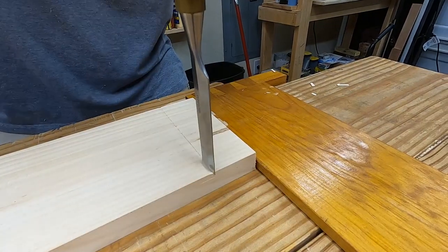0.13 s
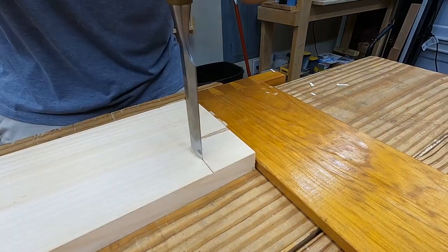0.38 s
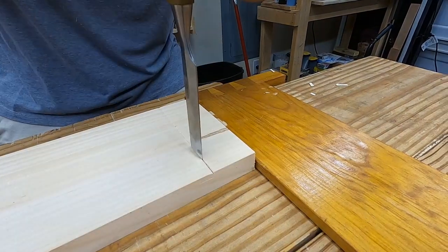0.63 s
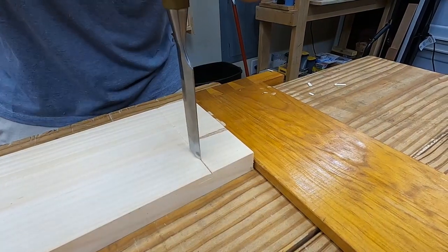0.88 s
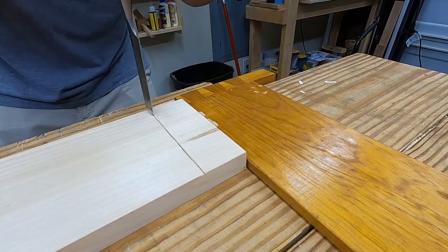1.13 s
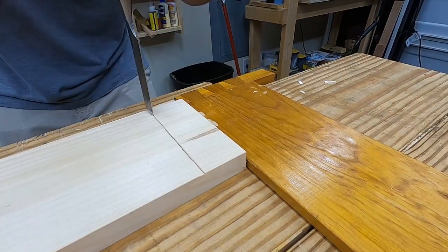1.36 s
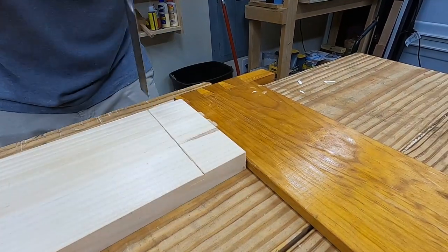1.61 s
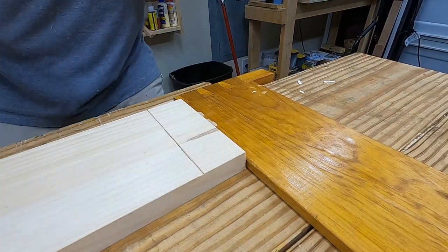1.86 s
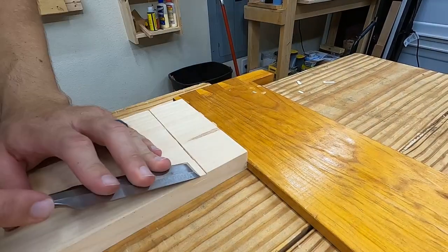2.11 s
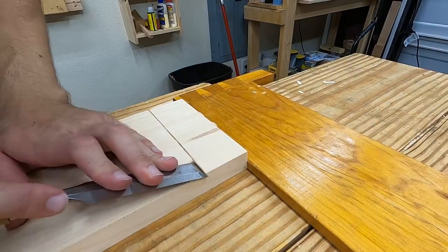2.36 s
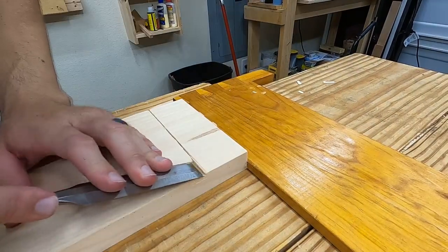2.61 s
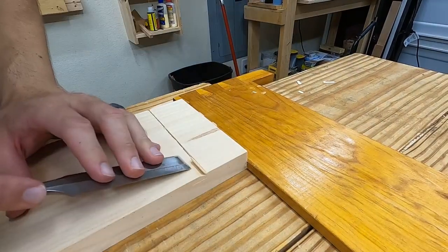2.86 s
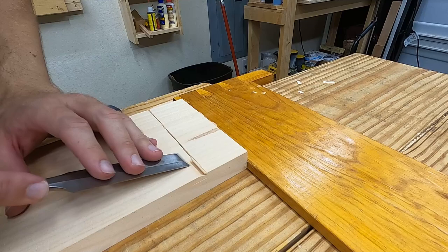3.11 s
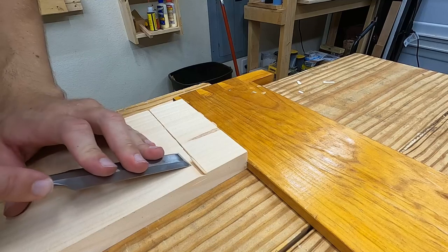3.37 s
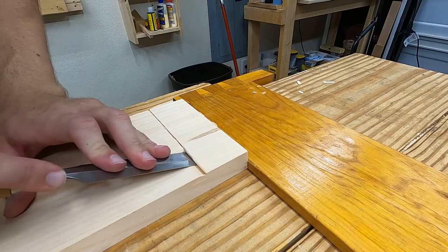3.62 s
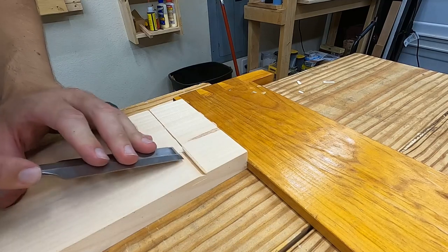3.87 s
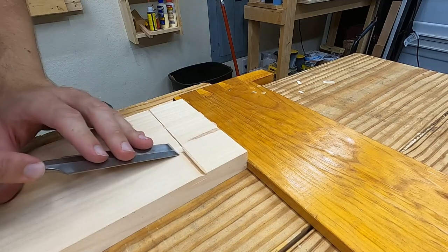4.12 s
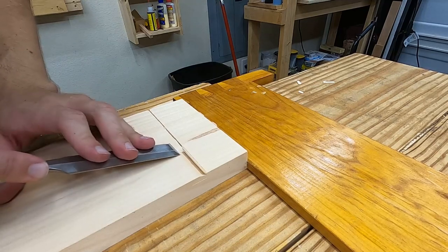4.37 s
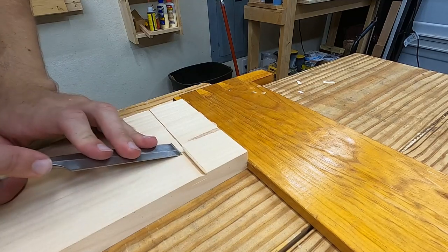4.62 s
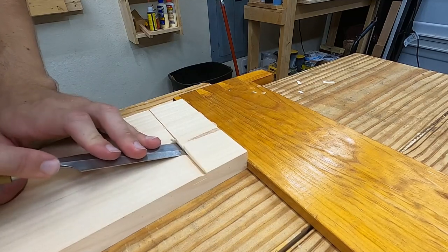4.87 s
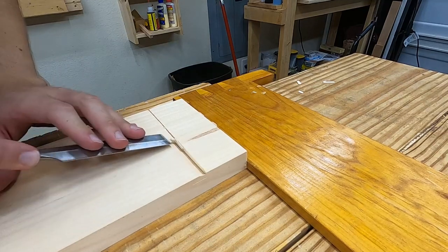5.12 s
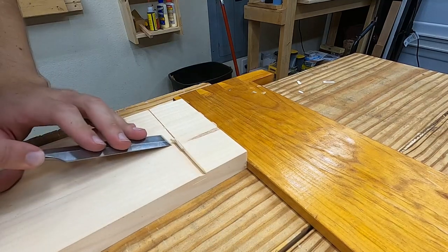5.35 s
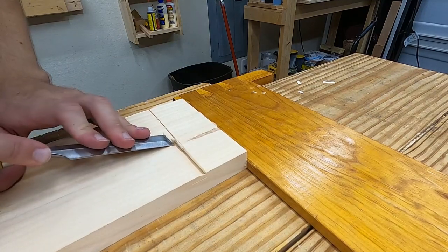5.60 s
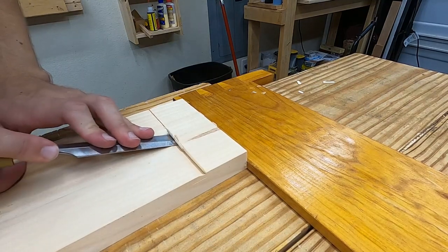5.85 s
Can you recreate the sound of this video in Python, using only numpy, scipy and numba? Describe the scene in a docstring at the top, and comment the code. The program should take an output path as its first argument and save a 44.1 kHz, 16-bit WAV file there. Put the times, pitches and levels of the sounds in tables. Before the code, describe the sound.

Close stereo microphones hear sharp wooden cracks ringing around a workshop, some echo tails cut off suddenly and loud ones swelling back. Five chisel blows come first. Then the blade is pushed by hand in short, rough bursts, with dry hiss, faint metallic ringing, bench rumble, little clicks and snapping fibres, ending in a tight flurry.

```python
"""Chisel on softwood

A mallet knocks a chisel five times into a softwood board on a bench, then the chisel pares across the grain by hand.
Each blow is a crack of decaying blade and board modes over the thud of the bench modes; an earlier blow still echoes.
Paring is grainy noise that hisses, snaps, makes the blade sing and shakes the bench.
Decaying noise bands make the workshop echo, over a low hum. Some tails break off abruptly,
and gain control ducks after hard blows, so their echo swells back."""
import sys
import numpy as np
from scipy import signal
from scipy.fft import rfft, irfft
from scipy.io import wavfile
from scipy.ndimage import uniform_filter1d
from numba import njit

SR = 44100
rng = np.random.default_rng(int(sys.argv[2]) if len(sys.argv) > 2 else 0)


def voltage_ratio(decibels):
    """Convert decibels (scalar or array-like) to amplitude ratios, 20 dB per decade."""
    exponent = np.asarray(decibels, float) / 20
    return 10 ** exponent


def inscribe(sig):
    """Save sig as 16-bit PCM at rate SR to the path in sys.argv[1].

    A 1-D sig is mono; a 2-D sig holds one channel per row.
    Samples are clipped to [-1, 1] before scaling.
    """
    pcm = np.round(np.clip(np.atleast_2d(sig).T, -1, 1) * 32767)
    wavfile.write(sys.argv[1], SR, pcm.astype(np.int16))


N = 263762
T = np.arange(N) / SR
LEAD = SR // 2  # samples of run-up: the workshop already rings at the opening

# Colour of the hum. Each row: frequency in Hz, relative density in dB per Hz.
AIR_COLOUR = [(15, -46.5), (25, -6.5), (60, -6), (113, -20), (136, -11.5), (301, -16.5), (425, -32),
              (2080, -45.5), (3830, -52.5), (9170, -61.5), (14000, -58.5)]
AIR_DB = -57  # rms
# Workshop echo. Each row: band centre in Hz, relative level in dB, 60 dB decay in seconds.
ECHO_BANDS = [(59, -5, 0.35), (130, -7.5, 0.33), (254, 1, 0.54), (483, -6, .6), (694, -13, .6),
              (1200, -10.5, 0.75), (1970, -15.5, 0.73), (3120, -17.5, 0.67), (6000, -16, 0.71),
              (8900, -17, 0.5), (13700, -21, 0.083)]
# Width of echo and hum. Each row: frequency in Hz, side over middle in dB before each source's own trim.
SIDE_COLOUR = [(60, -23), (110, -11.5), (200, -21.5), (380, -10), (700, -6.5), (1290, -8), (2380, -5),
               (4400, -3), (8120, 1.5), (15000, -9)]
# Moments in seconds where everything but the hum breaks off.
CUTS_S = [.3155, 1.1345, 2.068]

# Modes of blade and board. Each row: nominal frequency in Hz, relative level in dB, nominal 60 dB decay in seconds.
BLADE_MODES = [(700, -4, .012), (930, 0, .015), (1210, 0, .015), (1730, -3, .012), (2130, -3, .009),
               (2480, -3, .009), (3200, -1, .008), (3830, -7, .006), (4500, -6, .006), (5050, -6, .005),
               (6700, -8, .004), (7400, -10, .004), (8400, -11, .004), (9300, -9, .004), (11900, -20, .003)]
# Modes of the bench top. Each row: frequency in Hz, relative level in dB, 60 dB decay in seconds.
BENCH_MODES = [(54, -14, .4), (73, -10, .35), (102, -2, .35), (144, 0, .35), (172, -4, .2), (202, 0, .25),
               (224, -3, .25), (250, -5, .2), (290, -8, .2), (318, -8, .2), (343, -8, .2), (388, -8, .2),
               (425, -12, .15), (165, 6, .05), (500, -10, .04), (640, -12, .03)]
# The free blade when dragged. Each row: frequency in Hz, relative level in dB, 60 dB decay in seconds.
SINGING_MODES = [(1250, -6, .04), (3070, 0, .055), (3300, -3, .035), (6100, -16, .03)]

# Colour of the cutting edge. Each row: frequency in Hz, relative density in dB per Hz.
EDGE_COLOUR = [(290, -5.5), (500, -18), (795, -4), (1300, 3.5), (1420, -1), (2040, -4.5), (2770, -8.5),
               (3200, -3.5), (4030, -9.5), (4870, -11.5), (5710, -13.5), (12300, -20.5), (16000, -28.5)]
# Paring pushes. Each row: stop in seconds, length in seconds, swell in dB, edge hiss in dB, brightness in dB,
# relative blade ring in dB, relative bench rumble in dB.
STROKES = [(2.201, 0.014, 3, -79, 10, -90, -73.5), (2.436, .13, 30.5, -51, 2.5, -65, -60.5),
           (2.487, 0.056, 9.5, -33.5, 3, -53.5, -29.5), (2.766, 0.056, 7, -49.5, -0.5, -55.5, -44),
           (2.895, .06, 1.5, -73.5, 7, -93, -63), (3.041, 0.011, 0.5, -65.5, 8, -62, -78),
           (3.267, 0.193, -1, -90, 1.5, -88, -66), (3.467, 0.09, 22.5, -55, 1.5, -62, -54.5),
           (3.557, 0.056, 17, -51, 3.5, -59, -72), (3.685, .053, 8.5, -32, 1.5, -47.5, -27.5),
           (3.97, 0.1, 2.5, -68.5, 11, -66, -56.5), (4.47, 0.064, 8, -59, -1.5, -68, -56.5),
           (4.536, 0.052, 9.5, -54.5, -0.2, -63.5, -68), (4.665, 0.076, 15, -62.5, 1, -78, -78),
           (4.75, 0.028, 4.5, -39, 0, -58, -46.5), (4.857, 0.065, 16, -33, 0.5, -55, -32),
           (5.061, 0.036, 8, -57, -9.5, -78, -44.5), (5.102, .05, 12, -54, 7, -55, -59),
           (5.57, 0.074, 7.5, -53, -0.8, -79.5, -54.5), (5.635, .045, 4.5, -50, -1.2, -68, -65),
           (5.693, 0.031, -0.5, -53, -0.5, -78, -59.5), (5.744, .042, -6.5, -47, 0, -83, -49),
           (5.781, 0.036, 6, -52, 3, -82, -68), (5.852, .014, 2.5, -48.5, 9.5, -70, -60),
           (5.878, 0.031, 2.5, -34.5, 3, -57.5, -32.5)]
BITE_DB_PER_S, LIFT_DB_PER_S = 1100, 804  # the edge bites in, lets go
# the bench shakes most just after a push stops, then settles
SHAKE_LAG_S, SHAKE_SWELL_DB, SETTLE_DB_PER_S = .012, 6.5, 136
# Fibre snaps at set times. Each row: start in seconds, peak in dB at the source.
TIMED_SNAPS = [(2.7706, -40), (3.6356, -46.5), (3.6451, -28), (3.6691, -26), (4.7227, -40), (4.782, -40),
               (4.8271, -27.5), (4.8439, -30.5), (5.0938, -56), (5.7009, -32), (5.7294, -36), (5.7604, -43),
               (5.8346, -34.5), (5.8486, -23), (5.8666, -22)]
SMALL_SNAPS, SNAP_HZ, SNAP_OVER_HISS_DB = 200, 4905, -1.5  # count, typical pitch, least level
# Light taps of the blade on the board. Each row: start in seconds, crack peak in dB at the source, favoured mode
# in Hz, crack brightness in dB per octave, relative thud in dB.
TAPS = [(2.495, -23.5, 963, -3.5, -31), (2.663, -33.5, 4720, -2.5, -56), (3.034, -50, 3070, 9, -67.5),
        (3.244, -43, 895, -13.5, -57), (3.687, -20.5, 920, -5.5, -29), (4.176, -37, 928, -10.5, -52.5),
        (5.317, -22.5, 905, -6, -44), (5.49, -63.5, 900, -14, -48), (5.873, -31, 960, -7, -39)]
TAP_THUD_TILT_DB = 3.5  # per octave
OVERTONE = 1.86  # a tap's second favoured mode over its first
# Mallet blows. Each row: start in seconds, crack peak in dB at the source, two favoured modes in Hz, crack
# brightness in dB per octave, relative thud in dB, thud brightness in dB per octave.
BLOWS = [(-.35, 1, 1200, 3270, 5, -15, -13), (.081, 16, 2257, 9200, 0, -2, -0.5),
         (0.4957, -6.5, 2100, 3188, -4.5, -21.5, 8.5), (0.8758, 16, 1176, 2343, 1, -3.5, 0),
         (1.2232, -2.5, 1124, 2525, -1.5, -18.5, -5), (1.4872, 12, 1240, 3317, -1.5, -10, -1.5)]
BLOW_FAVOUR_DB, TAP_FAVOUR_DB = 4.5, 8  # lift of the favoured modes
BLOW_BLUR_HZ, TAP_BLUR_HZ = 600, 40  # a hard blow stirs many more modes, so its echo is less tuned
SPOT_DB, DETUNE = 1.5, .02  # spread from blow to blow: mode level, relative pitch

# Colour of the microphone. Each row: frequency in Hz, gain in dB.
MICROPHONE = [(20, -5), (6000, 1.5), (10000, -2.5), (12000, -6.5), (16000, -13.5)]
# Balance of the channels. Each row: frequency in Hz, left minus right in dB.
LEAN = [(60, -0.5), (110, 1), (200, 0), (380, -0.5), (700, 0.5), (1290, 2.5), (2380, 4), (4400, 3),
        (8120, 0), (15000, -7)]


def shape(x, table):
    """Colours x by (Hz, dB) points joined on a log-frequency axis."""
    hz, db = np.transpose(table)[:2]
    size = x.shape[-1]
    f = np.maximum(np.fft.rfftfreq(size, 1 / SR), 1)
    return irfft(rfft(x) * voltage_ratio(np.interp(np.log(f), np.log(hz), db)), size)


def level(x, db):
    """Sets the rms level in dB."""
    return x * voltage_ratio(db) / np.sqrt(np.mean(x ** 2))


def walk(rate):
    """Random levels held for 1 / rate seconds and slewed into each other; spread near 1."""
    hold = int(SR / rate)
    return uniform_filter1d(np.repeat(rng.standard_normal(N // hold + 1), hold), hold)[:N]


def stereo(mid, side):
    """Left and right from a middle and a side signal."""
    return np.array([mid + side, mid - side])


def rings(modes, seconds, extra_db=0):
    """Decaying sines that all start at the blow, one row per mode."""
    hz, db, t60 = np.transpose(modes)[:, :, None]
    t = np.arange(int(seconds * SR)) / SR
    return voltage_ratio(db + extra_db - 60 * t / t60) * np.sin(2 * np.pi * hz * t)


def ring(modes, seconds, extra_db=0):
    """The decaying sines of all modes summed."""
    return rings(modes, seconds, extra_db).sum(axis=0)


def air():
    """Low hum of the quiet workshop: coloured noise, wavering slowly."""
    mid, side = shape(rng.standard_normal((2, N)), AIR_COLOUR) * voltage_ratio(2.4 * walk(7))
    side = shape(side, SIDE_COLOUR) * voltage_ratio(8.5)
    return level(stereo(mid, side), AIR_DB)


def shop():
    """Workshop echo, middle and side: overlapping noise bands build up in a few ms and die at their own rate."""
    t = np.arange(int(.9 * SR)) / SR
    spectrum = rfft(rng.standard_normal((2, len(t))))
    f = np.log(np.fft.rfftfreq(len(t), 1 / SR) + 1)
    centres = np.log(np.array(ECHO_BANDS)[:, 0])
    echo = 0
    for (hz, db, t60), share in zip(ECHO_BANDS, np.eye(len(ECHO_BANDS))):
        band = irfft(spectrum * np.interp(f, centres, share), len(t))
        echo = echo + voltage_ratio(db - 60 * t / t60) * band / np.sqrt(t60)
    return echo * (1 - np.exp(-t / 0.0013)) * voltage_ratio(-32.0)


def resonate(x, hz, t60):
    """One mode driven by x through a two-pole resonator, rms 1."""
    r = voltage_ratio(-60 / (t60 * SR))
    return level(signal.lfilter([1], [1, -2 * r * np.cos(2 * np.pi * hz / SR), r * r], x), 0)


def driven(x, modes, seconds):
    """Noise driving a set of modes: convolution with their ring, scaled to unit energy."""
    response = ring(modes, seconds)
    return signal.fftconvolve(x, response / np.linalg.norm(response))[:N]


def effort(peak_db, release_db_per_s, more_swell_db=0, lag_s=0):
    """Gain over time: every push bites in, swells to its stop plus the lag, then releases."""
    stop, length, swell_db = np.transpose(STROKES)[:3, :, None]
    coarse = T[::32]
    late = coarse - lag_s - stop
    db = peak_db[:, None] + (swell_db + more_swell_db) * np.clip(late / length, -1, 0)
    db = db + BITE_DB_PER_S * np.minimum(late + length, 0) - release_db_per_s * np.maximum(late, 0)
    together = np.sqrt(voltage_ratio(2 * db).sum(axis=0))  # powers of all pushes add
    return np.interp(T, coarse, together)


def snaps(hiss):
    """A brief bright noise burst for every fibre that breaks: some at set times, others at random, following the hiss."""
    out, t = np.zeros(N + 200), np.arange(200) / SR
    when, size = rng.random((SMALL_SNAPS, 2)).T
    first = STROKES[0][0] * SR
    at = (first + when * (N - first)).astype(int)
    gain = hiss[at] * voltage_ratio(SNAP_OVER_HISS_DB - 4.0 * np.log(1 - size))  # a few stand out far
    timed_s, timed_db = np.transpose(TIMED_SNAPS)
    at = np.append((timed_s * SR).astype(int), at)
    gain = np.append(voltage_ratio(timed_db), gain)
    for i, g, noise in zip(at, gain, rng.standard_normal((len(at), len(t) + 1))):
        hz = SNAP_HZ * 2 ** (.25 * noise[0])
        burst = shape(noise[1:], [(hz / 6, -18), (hz, 0), (hz * 7.5, -8)]) * np.exp(-t / 0.0015)
        out[i:i + len(t)] += g * burst / np.abs(burst).max()
    return out[:N]


def strokes():
    """The edge tears fibres: dense uneven grains that hiss, make the blade sing and shake the bench."""
    hiss_db, tilt_db, ring_db, rumble_db = np.transpose(STROKES)[3:]
    grains = rng.standard_normal(N) * voltage_ratio(1.6 * walk(900) + 2.8 * walk(120))
    # as the edge advances, the modes of blade and board come and go
    body = sum(resonate(grains, f, 0.56 * t60) / np.sqrt(t60) * voltage_ratio(7.7 * walk(12)) for f, _, t60 in BLADE_MODES)
    edge = level(shape(grains + level(body, -4.5), EDGE_COLOUR), 0)
    dull = signal.sosfilt(signal.butter(1, 3000, fs=SR, output="sos"), edge)
    bright = edge - dull
    low = effort(hiss_db - tilt_db, LIFT_DB_PER_S)
    high = effort(hiss_db + tilt_db, LIFT_DB_PER_S)
    singing = driven(grains * effort(ring_db, LIFT_DB_PER_S), SINGING_MODES, .2)
    shake = rng.standard_normal(N) * voltage_ratio(5.2 * walk(150))
    shake = shake * effort(rumble_db, SETTLE_DB_PER_S, SHAKE_SWELL_DB, SHAKE_LAG_S)
    return low * dull + high * bright + singing + snaps(high) + driven(shake, BENCH_MODES, .8)


def all_round(rows, blur_hz):
    """Modes radiate in different directions, so walls receive their summed power: a causal pulse without notches."""
    size = rows.shape[1]
    power = np.sum(np.abs(rfft(rows)) ** 2, axis=0)
    power = uniform_filter1d(power, size=1 + int(blur_hz * size / SR))
    # folding the cepstrum forward gives the minimum-phase pulse of this spectrum
    cepstrum = irfft(.5 * np.log(power), size)
    cepstrum[1:size // 2] *= 2
    cepstrum[size // 2 + 1:] = 0
    return irfft(np.exp(rfft(cepstrum)), size)


def hit(db, low_hz, high_hz, tilt_db, thud_db, thud_tilt_db, favour_db, blur_hz, luck):
    """One blow, as heard close by and as sent to the walls: blade and board crack, then the bench gives way and rings."""
    hz, mode_db, t60 = np.transpose(BLADE_MODES)
    spot, detune = luck[:len(hz)].T
    # each spot on the board lets two modes sound louder and longer, and the grip detunes the blade a little
    favour = sum(np.exp(-(np.log2(hz / f) / .15) ** 2) for f in (low_hz, high_hz))
    mode_db = mode_db + tilt_db * np.log2(hz / 1500) + favour_db * favour + SPOT_DB * spot
    t60 = t60 * (1.5 + 0.043 * favour_db * favour)
    rows = rings(np.transpose([hz * (1 + DETUNE * detune), mode_db, t60]), .1)
    crack = (-1.) ** np.arange(len(hz)) @ rows  # neighbouring modes start in opposite phase
    octaves = np.log2(np.array(BENCH_MODES)[:, :1] / 200)
    thud = -ring(BENCH_MODES, .8, thud_db + thud_tilt_db * octaves + 2.8 * luck[len(hz):, :1])
    out = np.tile(np.roll(thud, int(.0015 * SR)), (2, 1))  # the bench answers a moment later
    out[:, :len(crack)] += voltage_ratio(db) * np.array([crack, all_round(rows, blur_hz)]) / np.abs(crack).max()
    return out


def knocks():
    """Blows and taps as rows of one form: start, then the settings of hit() up to the blur."""
    blows = [(*row, BLOW_FAVOUR_DB, BLOW_BLUR_HZ) for row in BLOWS]
    taps = [(s, db, hz, OVERTONE * hz, tilt, thud, TAP_THUD_TILT_DB, TAP_FAVOUR_DB, TAP_BLUR_HZ)
            for s, db, hz, tilt, thud in TAPS]
    return blows + taps


def scene():
    """Knocks, then paring in the last stretch; work and echo of each stretch break off at its end, the hum runs on."""
    out = np.zeros((2, LEAD + N))
    edges = [0] + [LEAD + int(s * SR) for s in CUTS_S] + [LEAD + N]
    luck = rng.standard_normal((len(knocks()), len(BLADE_MODES) + len(BENCH_MODES), 2))
    for a, b in zip(edges, edges[1:]):
        work = np.zeros((2, LEAD + N + SR))  # heard close by, sent to the walls
        if b == LEAD + N:
            work[:, LEAD:b] = strokes()
        for (s, *blow), chance in zip(knocks(), luck):
            i = LEAD + int(s * SR)
            if a <= i < b:
                work[:, i:i + int(.8 * SR)] += hit(*blow, chance)
        near, far = work[:, a:b]
        mid, side = signal.fftconvolve(far[None], shop(), axes=1)[:, :b - a]
        # the left microphone hears the work about a sample later
        lag = -.45 * np.gradient(near + mid)
        out[:, a:b] = stereo(near + mid, shape(side * voltage_ratio(-1.0), SIDE_COLOUR) + lag)
    return out[:, LEAD:] + air()


@njit
def follow(x, attack, release):
    """Envelope that rises fast and falls at a steady dB rate."""
    out, e = np.empty(len(x)), 1e-6
    for i in range(len(x)):
        e = e + (x[i] - e) * attack if x[i] > e else e * release
        out[i] = e
    return out


def band_limit(x):
    """A steep low-pass at the top of the band."""
    return signal.sosfilt(signal.butter(12, 16640, fs=SR, output="sos"), x)


def record(dry):
    """Faint copies run ahead of each attack, gain control ducks loud blows afresh in every stretch, peaks are rounded."""
    dry = shape(dry, MICROPHONE)
    dry = np.array([shape(v, np.multiply(LEAN, [1, half])) for v, half in zip(dry, (.5, -.5))])
    x = dry.copy()
    step = round(SR * 512 / 48000)  # samples between the early copies
    for k, db in enumerate([-32.0, -44.0, -59.5, -76], start=1):
        x[:, :-k * step] += voltage_ratio(db) * dry[:, k * step:]
    edges = [0] + [int(s * SR) for s in CUTS_S] + [N]
    peak = np.abs(x).max(axis=0)
    attack, release = 1 / (0.00058 * SR), voltage_ratio(-130 / SR)  # 0.58 ms, 130 dB per second
    env = np.concatenate([follow(peak[a:b], attack, release) for a, b in zip(edges, edges[1:])])
    x = x * np.minimum(voltage_ratio(-13.0) / env, 1) ** 0.62  # above -13 dB, 0.62 of the excess is taken off
    x = signal.sosfilt(signal.butter(4, 50, "high", fs=SR, output="sos"), np.tanh(x))
    return band_limit(np.clip(x, -1, 1))


dry = scene()
out = record(dry)
inscribe(out)
```